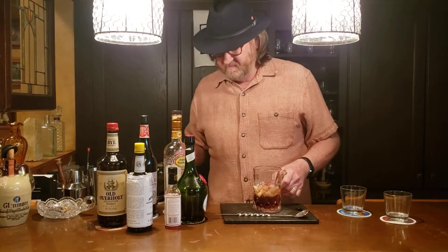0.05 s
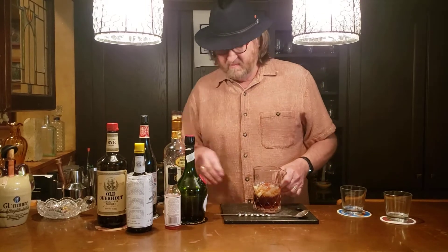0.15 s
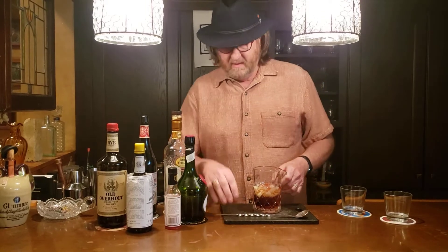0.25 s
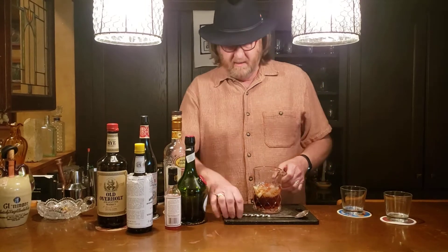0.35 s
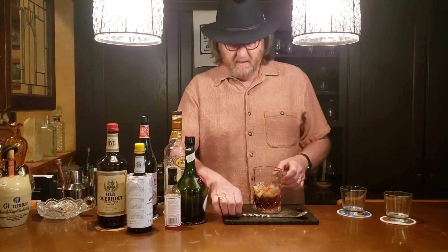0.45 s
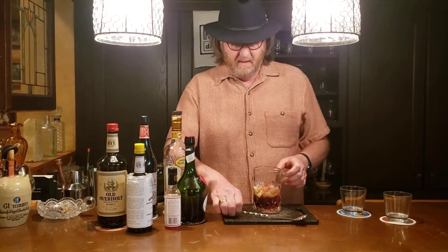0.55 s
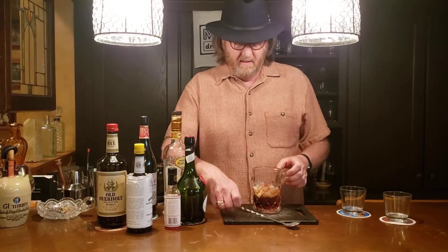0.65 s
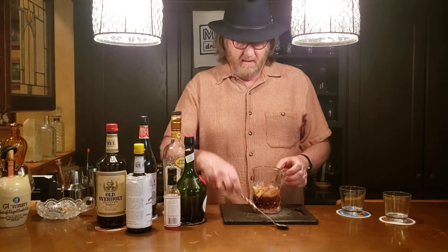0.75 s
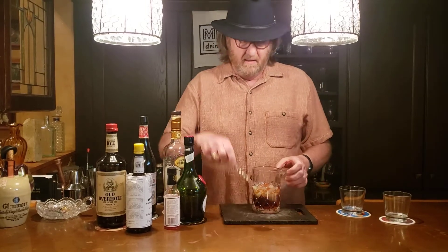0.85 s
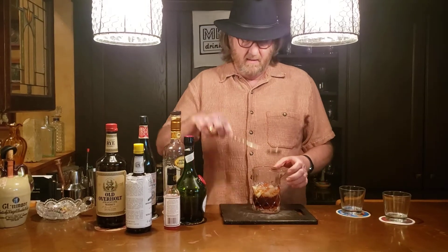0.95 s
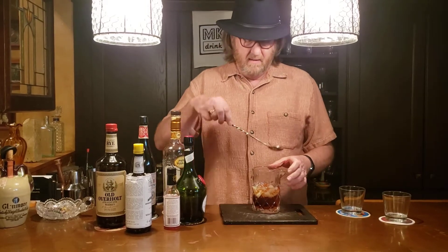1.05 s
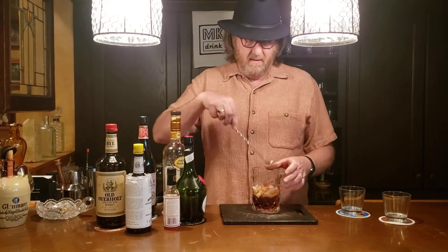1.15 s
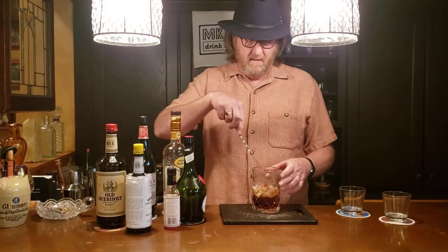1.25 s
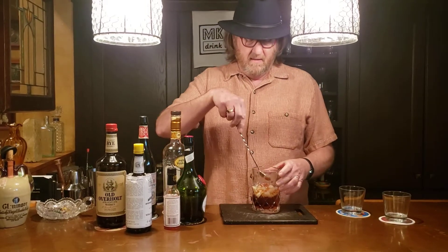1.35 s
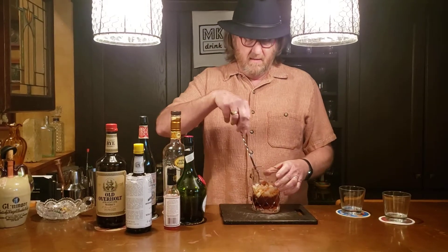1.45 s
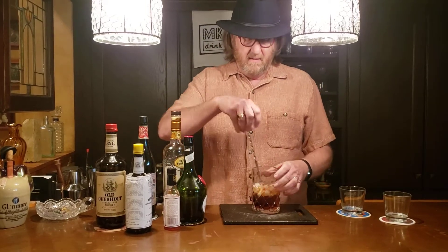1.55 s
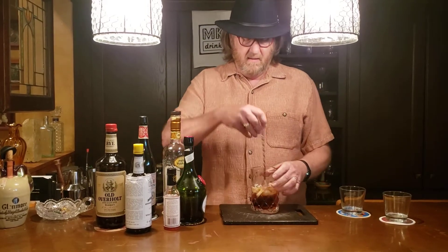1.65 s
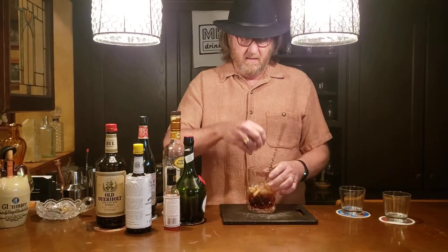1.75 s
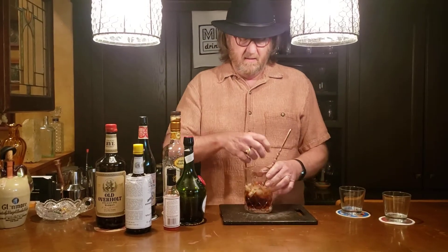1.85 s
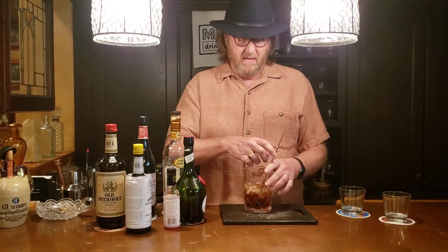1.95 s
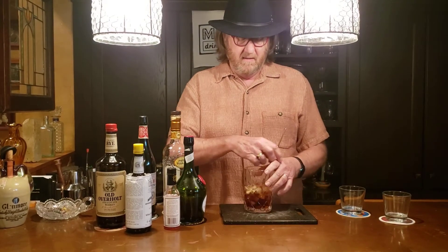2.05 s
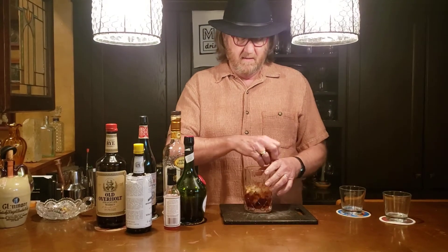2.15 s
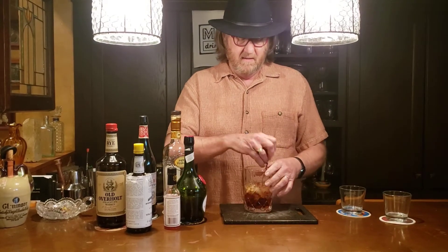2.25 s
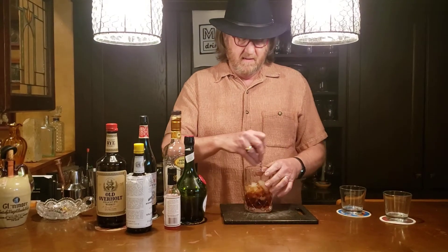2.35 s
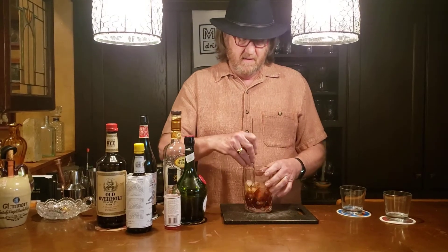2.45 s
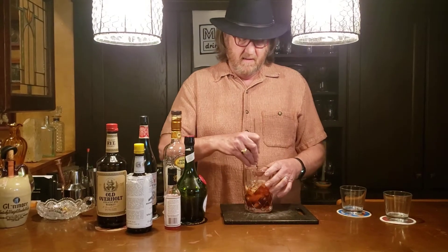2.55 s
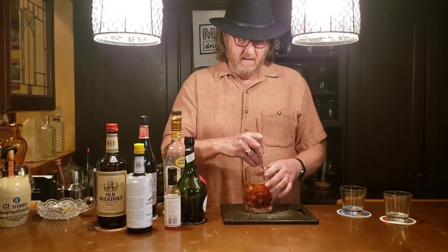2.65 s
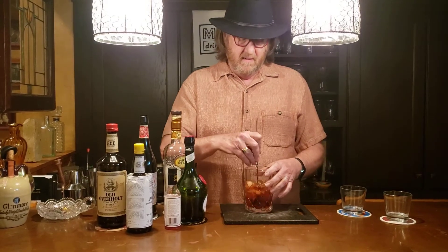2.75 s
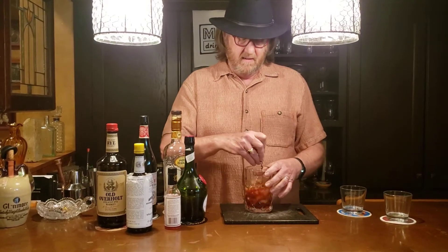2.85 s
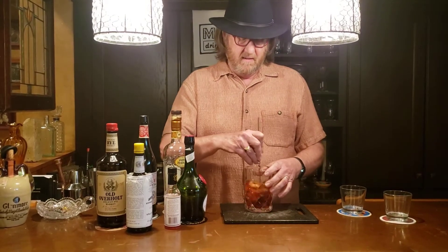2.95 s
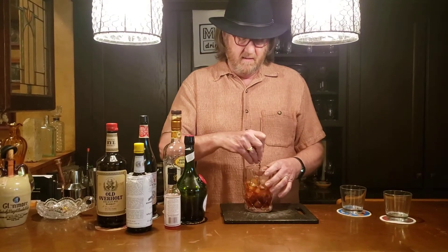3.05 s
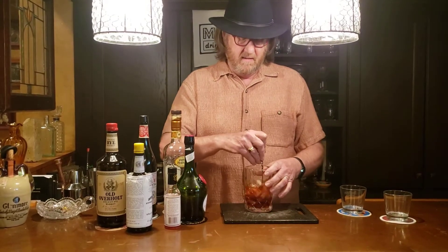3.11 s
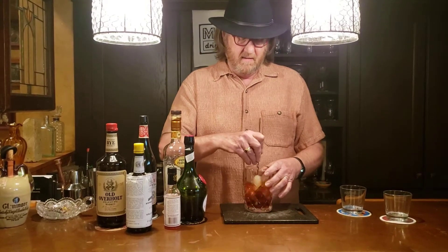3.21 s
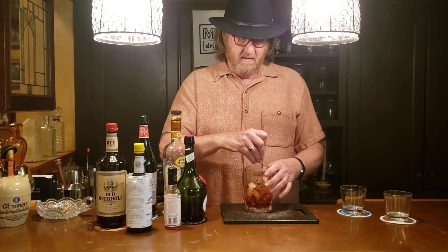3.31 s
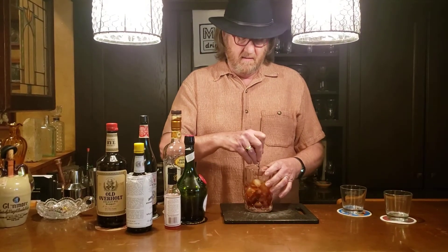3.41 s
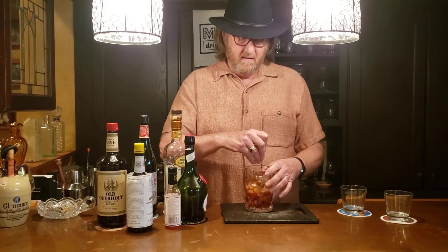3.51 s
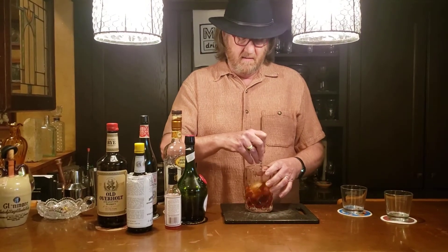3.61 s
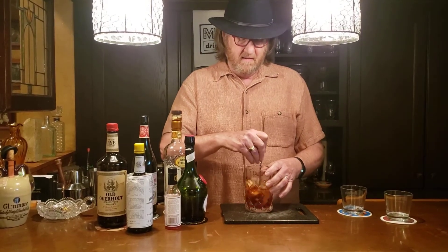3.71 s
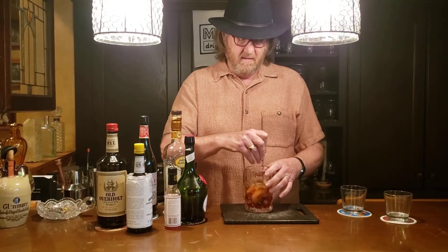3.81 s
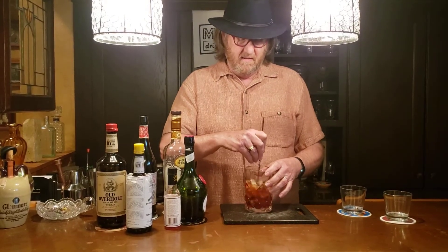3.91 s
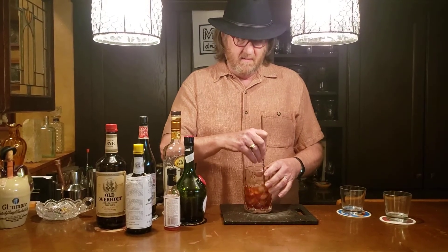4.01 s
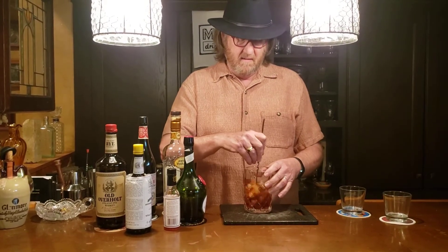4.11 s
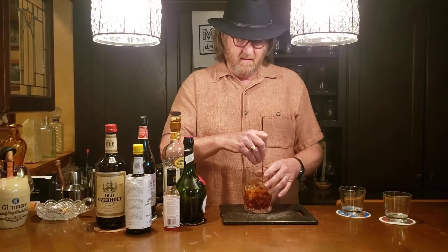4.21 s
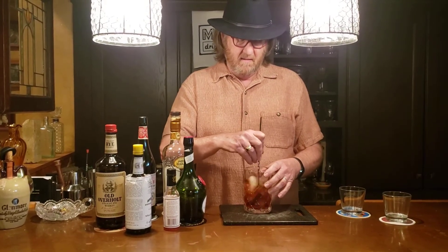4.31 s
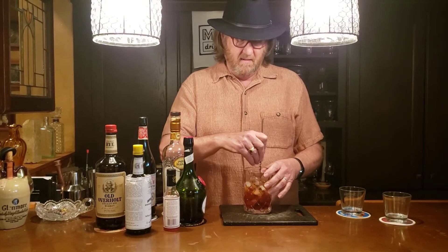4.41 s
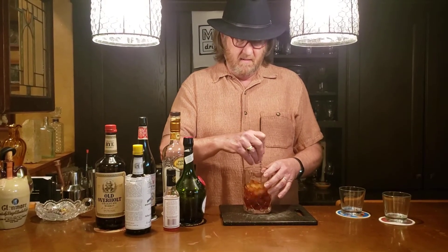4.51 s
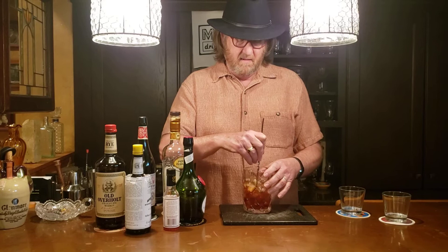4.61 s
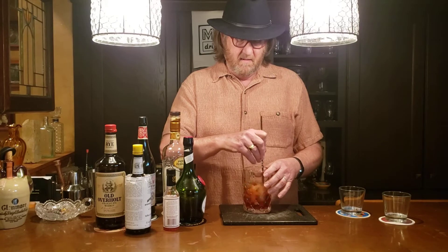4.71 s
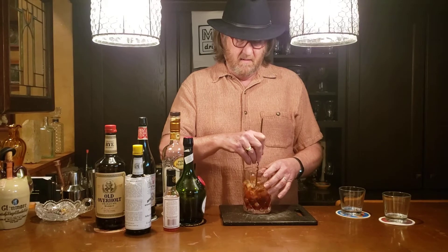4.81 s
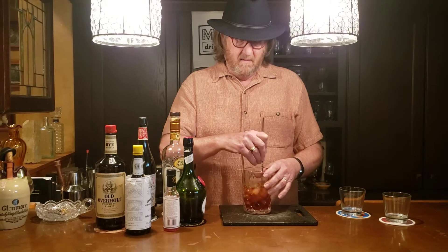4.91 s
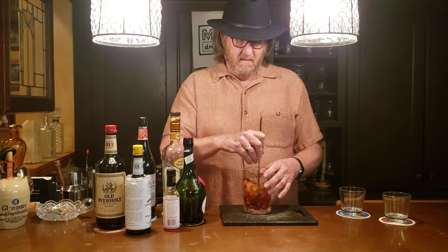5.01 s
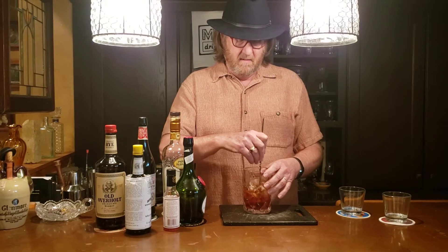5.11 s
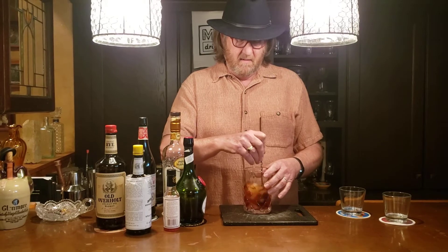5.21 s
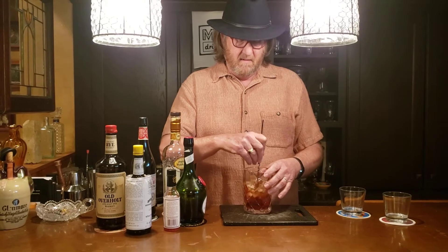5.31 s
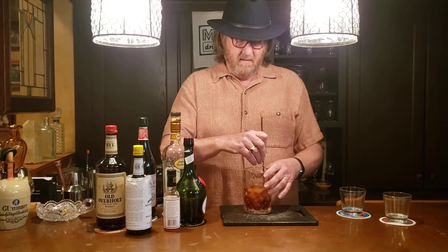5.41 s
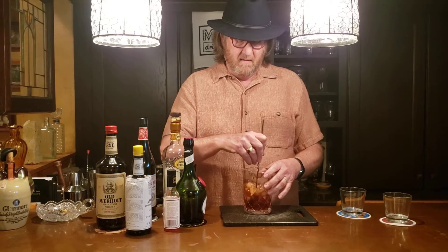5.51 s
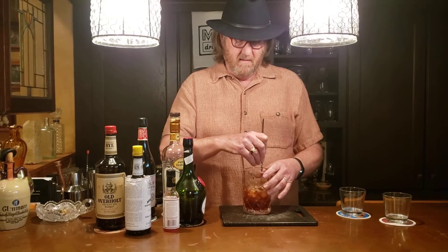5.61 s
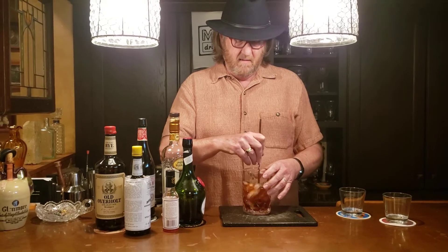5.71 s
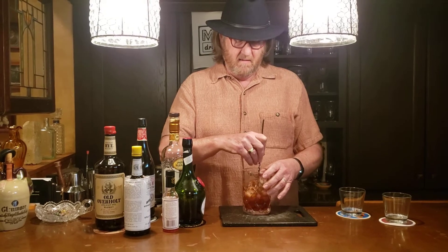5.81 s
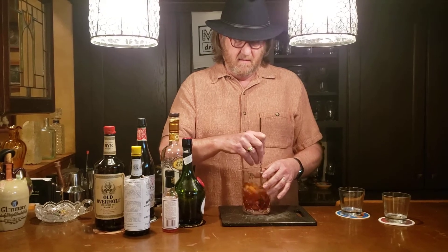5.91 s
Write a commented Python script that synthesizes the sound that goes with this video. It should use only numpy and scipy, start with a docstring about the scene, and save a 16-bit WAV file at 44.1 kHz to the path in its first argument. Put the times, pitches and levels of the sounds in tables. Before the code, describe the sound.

A small indoor room with a faint, slightly wavering low appliance hum and soft air noise throughout. At about 0.4 s a hand lands on a board with soft dull thuds, followed by brief sliding; around 0.65 to 0.76 s the spoon is lifted with a quick cluster of taps and a light clack. From 1.2 to 1.85 s the metal spoon pushes down between ice cubes in a glass: bright knocks, short rattling scrapes, high metallic ringing becoming muffled in the drink, and a bottom tap near 1.7 s. Only faint contacts follow until 2.3 s. Then brisk stirring runs to the end at about 6 s: irregular, rapid ice clinks with a short clear glass ring near 2.2 kHz, varied in strength, over grainy rubbing, ticks and occasional squeaky skids. Small watery gurgles appear after 4 s, and clinks soften slightly towards the end. Close stereo microphones, short lively echo.

```python
"""At a bar counter in a small room, a spoon is picked off a board, pushed between ice cubes and stirred.
Cubes and spoon knock on the glass: each knock is a coloured noise burst plus decaying modes of what is hit.
Between knocks come rubbing ice and ticks of filtered noise, skids of swept resonance and gurgles of gliding sines.
An appliance hums behind as a few sines, heard with a slight waver, over soft noise; two microphones hear it all
with the room's echo of the bar sounds.
"""
import sys
import numpy as np
from scipy import signal
from scipy.fft import rfft, irfft, next_fast_len
from scipy.io import wavfile
from scipy.ndimage import uniform_filter1d

SR = 44100
rng = np.random.default_rng(int(sys.argv[2]) if len(sys.argv) > 2 else 0)


def wrap_up_sound(samples):
    """Save the sound to the file named by the first command line argument, as 16-bit audio."""
    columns = np.atleast_2d(samples).T
    # keep every value between -1 and 1, then stretch to whole-number steps
    tamed = np.clip(columns, -1, 1)
    steps = np.round(tamed * 32767).astype(np.int16)
    wavfile.write(sys.argv[1], SR, steps)


N = 262836
TIME = np.arange(N) / SR
AGE = TIME[:20000]  # seconds since the onset of a single sound


def undb(db):
    """Turn decibels into gain."""
    return 10 ** (np.asarray(db) / 20)


def law(x, points):
    """Read a table of (x, value) joined by straight lines."""
    return np.interp(x, *np.transpose(points))


def along(hz, points):
    """Read a table of (Hz, value) on a log-frequency axis."""
    f, value = np.transpose(points)
    return np.interp(np.log(hz + 1), np.log(f), value)


def colour(x, *spectra):
    """Causal minimum-phase filter whose gain is the sum of some (Hz, dB) tables."""
    size = next_fast_len(len(x) // 2 + 1, True) * 2
    hz = np.fft.rfftfreq(size, 1 / SR)
    gain_db = sum(along(hz, spectrum) for spectrum in spectra)
    cepstrum = irfft(np.log(undb(gain_db)))
    # fold the cepstrum forward so that nothing sounds before the input
    cepstrum[1:size // 2] *= 2
    cepstrum[size // 2 + 1:] = 0
    return irfft(rfft(x, size) * np.exp(rfft(cepstrum)))[:len(x)]


def unit(x):
    """Scale to an RMS of one."""
    return x / np.sqrt(np.mean(x ** 2))


def fade(t60):
    """Exponential decay that falls 60 dB in t60 seconds."""
    return np.exp(-np.log(1000) * AGE / t60)


def add(track, s, sound):
    """Mix a sound in at time s."""
    start = max(int(s * SR), 0)
    track[start:start + len(sound)] += sound[:N - start]


def grains(per_s, spread_db):
    """Random tiny impacts, most weak and a few strong."""
    chance = rng.random(N)
    size = np.minimum(rng.exponential(size=N), 4)
    return (chance < per_s / SR) * undb(spread_db * size) * rng.choice([-1, 1], N)


def stroke(start, length, attack_s, t60):
    """Pressure of one slide: it builds, holds and dies away."""
    build = np.clip((TIME - start) / attack_s, 0, 1)
    return build * np.exp(-np.log(1000) * np.maximum(TIME - start - length, 0) / t60)


def ring(modes, length=1, scatter_db=2.0):
    """Decaying modes; each blow lands elsewhere and weights them a little differently."""
    out = 0
    for hz, db, t60 in modes:
        weight = undb(db + scatter_db * rng.standard_normal()) * rng.choice([-1, 1])
        out = out + weight * np.sin(2 * np.pi * hz * AGE) * fade(t60 * length)
    return out


# close pair of leading wall modes: (frequency [Hz], relative level [dB], nominal t60 [s])
RIM_MODES = [(2240.8, -2.5, 0.19), (2260, -6, 0.27)]


def rim(upper, length=1, sag_hz=0):
    """The wall's leading mode is a close pair; the place of the blow decides which of the two leads."""
    upper = np.clip(upper, .03, .97)
    out = 0
    for share, (hz, db, t60) in zip((1 - upper, upper), RIM_MODES):
        tone = np.sin(2 * np.pi * (hz - sag_hz) * AGE)
        out = out + np.sqrt(share) * undb(db) * tone * fade(t60 * length)
    return out


def crack(tone, body_db, crack_db, treble_db, t60, rise_s=0.00027):
    """A contact: a short noise burst, coloured by the materials and by how hard it is."""
    envelope = fade(t60) * (1 - np.exp(-AGE / rise_s))
    burst = unit(rng.standard_normal(len(AGE)) * envelope) / np.sqrt(len(AGE))  # unit energy
    force = [(1400, body_db), (3300, crack_db), (6200, crack_db), (9000, treble_db)]
    return colour(burst, tone, force)


STIR_START_S, STIR_RISE_S = 2.33, 0.024
LIGHT_RING_DB, LIGHT_CRACK_DB = -44, -49  # relative, like the firm knocks


def light_knocks(count=7):
    """Weak knocks scattered through the stirring, one at random in each equal slot of time."""
    slots = (np.arange(count) + rng.random(count)) / count
    times = STIR_START_S + slots * (TIME[-1] - STIR_START_S)
    return [(s, LIGHT_RING_DB, LIGHT_CRACK_DB) for s in times]


# cubes knocking on the wall: (time [s], relative ring level [dB], relative crack level [dB])
ICE_KNOCKS = [(2.4232, -22.5, -30.5), (2.5521, -51, -43.5), (2.738, -22, -33.5), (2.8727, -22.5, -30),
              (3.0903, -26.5, -33), (3.302, -31.5, -34.5), (3.419, -38, -42), (3.4433, -20.5, -27.5),
              (3.5188, -27, -31.5), (3.6589, -19.5, -30.5), (3.7593, -33, -33.5), (3.886, -20.5, -30.5),
              (3.963, -38, -30.5), (4.078, -36.5, -41.5), (4.1786, -37.5, -43), (4.3437, -27, -33.5),
              (4.4364, -29.5, -30), (4.541, -33.5, -47.5), (4.5858, -25.5, -31), (4.6733, -38, -33),
              (4.8316, -25.5, -30), (4.905, -31.5, -32), (5.0362, -22, -30.5), (5.1419, -30, -29.5),
              (5.2417, -38.5, -46), (5.368, -43, -39), (5.485, -31, -40), (5.6145, -42, -31.5),
              (5.843, -42, -36)]
# spectrum of ice on glass: (frequency [Hz], relative level [dB])
ICE_SPECTRUM = [(100, -31), (400, 2), (750, 1.5), (1100, 12), (1600, 8.5), (2050, 11.5), (2800, 0),
                (3400, 2.5), (4300, 10.5), (5700, 7), (7200, 1), (9000, -1), (12000, 8), (15500, 1)]
# harder knocks are brighter: (crack level [dB], treble against crack [dB])
KNOCK_BRIGHTNESS = [(-45, -6.5), (-30.5, -2)]
# further modes of the glass: (frequency [Hz], relative level [dB], nominal t60 [s])
GLASS_MODES = [(2078, -8, 0.037), (2297, -8.5, 0.071), (4110, -26, 0.014), (4440, -29.5, 0.037),
               (5000, -29, 0.056), (5586, -11, 0.059), (5790, -7, 0.034), (6000, -25, .08)]
# modes of the counter: (frequency [Hz], relative level [dB], t60 [s])
COUNTER_MODES = [(68.7, -6.5, 0.17), (170, -25, 0.099), (218, 0.5, 0.12), (243, -4.5, 0.28),
                 (341.6, -15.5, 0.13), (478, -14, 0.27)]
# a knock's low body follows its crack up to a ceiling
BODY_BELOW_DB, BODY_CEILING_DB = 2, -41.5
# the sloshing drink climbs the wall and lowers its pitch by up to this much
SLOSH_SAG_HZ = 27.1


def ice(ring_db=5, crack_db=25, crack_t60=0.012, glancing_t60=0.07, glass_db=2, thud_db=-20, held=0.45,
        rebound_db=-13, upper_share=.5):
    """Cubes hit the wall: a dry crack and its rebound, the ring of the glass, a faint thud in the counter."""
    cracks, rings = np.zeros(N), np.zeros(N)
    knocks = list(ICE_KNOCKS) + light_knocks()
    for (s, wall, mid), (bounce, spot, slosh) in zip(knocks, rng.random((len(knocks), 3))):
        body = min(mid - BODY_BELOW_DB, BODY_CEILING_DB)
        treble = mid + law(mid, KNOCK_BRIGHTNESS)
        rebound_s = np.interp(bounce, [0, 1], [0.0051, 0.028])
        # hard knocks are one short snap, weak ones a glancing scuff
        contact_t60 = np.interp(treble, [-48, -36], [glancing_t60, crack_t60])
        for delay, db in ((0, crack_db), (rebound_s, crack_db + rebound_db)):
            add(cracks, s + delay, undb(db) * crack(ICE_SPECTRUM, body, mid, treble, contact_t60))
        add(cracks, s, undb(body + thud_db) * ring(COUNTER_MODES))
        # a slow cube stays against the wall and damps it
        length = np.interp(wall, [-27, -19], [held, 1])
        add(rings, s, undb(wall + ring_db) * rim(upper_share * spot, length, SLOSH_SAG_HZ * slosh))
        add(rings, s, undb((wall + mid) / 2 + glass_db) * ring(GLASS_MODES, length))
    return cracks, rings


# spoon on ice and glass: (time [s], ring [dB], crack [dB], downward push [dB]), relative levels
SPOON_KNOCKS = [(1.212, -43, -34, -34.5), (1.265, -27, -32, -40.5), (1.3443, -37, -30.5, -35.5),
                (1.4999, -28, -28, -48.5), (1.7278, -65, -29.5, -29.5), (1.841, -32, -35.5, -38),
                (2.0, -49.5, -56, -67), (2.161, -45, -48.5, -72), (2.369, -26, -39, -49)]
# spectrum of the spoon's contacts: (frequency [Hz], relative level [dB])
SPOON_SPECTRUM = [(100, -16.5), (400, 2), (700, 1.5), (1050, 15), (1500, 4.5), (2100, 14.5), (3300, -1),
                  (5700, 6.5), (7500, -2), (15500, 3.5)]
# the spoon sinks to the bottom and is eased up again: (time [s], depth [0-1])
SPOON_DEPTH = [(1.21, 0.07), (1.48, 0.67), (1.70, 1), (1.85, 0.68)]
# the drink muffles the spoon's bowl: (depth [0-1], treble against crack [dB])
DRINK_MUFFLING = [(0, 9), (.25, -1), (1, -12)]
# the stem rings once the spoon stands on the bottom: (depth [0-1], stem against crack [dB])
STEM_GROUNDING = [(.7, -29), (1, 11.5)]
# modes of the spoon's bowl: (frequency [Hz], relative level [dB], nominal t60 [s])
BOWL_MODES = [(10200, -5.5, 0.092), (11720, -2.5, 0.016), (12030, 3, 0.055), (13400, -14.5, .11),
              (14200, -21, 0.057), (15100, -9, .08)]
# modes of the spoon's stem: (frequency [Hz], relative level [dB], nominal t60 [s])
STEM_MODES = [(1769, -14, .1), (2417, -7, .06), (3189, -7, .13), (3730, -14, .09), (4031, 0, .13),
              (4115, -9, .08), (5513, -12, .12), (6455, -15, .13), (11380, -18, .08)]


def spoon(ring_db=1, crack_db=25, crack_t60=0.013, glass_db=8, bowl_db=0, rim_length=1.2, length=1.2,
          weight_db=7, thud_db=-15, drowned=.25):
    """Steel pushes between the cubes; the loosely held glass rings longer, the bowl and stem ring too."""
    cracks, rings = np.zeros(N), np.zeros(N)
    for s, wall, mid, push in SPOON_KNOCKS:
        depth = law(s, SPOON_DEPTH)
        treble = mid + law(depth, DRINK_MUFFLING)
        stem = mid + law(depth, STEM_GROUNDING)
        add(cracks, s, undb(crack_db) * crack(SPOON_SPECTRUM, push, mid, treble, crack_t60))
        # the push goes down through the glass into the counter
        thud = colour(ring(COUNTER_MODES), [(72, weight_db), (110, -3), (190, 3)])
        add(cracks, s, undb(push + thud_db) * thud)
        add(rings, s, undb(wall + ring_db) * rim(0.71, rim_length))
        add(rings, s, undb((wall + mid) / 2 + glass_db) * ring(GLASS_MODES, length))
        # deeper in the drink the bowl's ring is shorter
        bowl_length = np.interp(depth, [0, 1], [1, drowned])
        add(rings, s, undb(treble + bowl_db) * ring(BOWL_MODES, bowl_length))
        add(rings, s, undb(stem) * ring(STEM_MODES))
    return cracks, rings


# the twisted stem rattling along the cubes: (start [s], length [s], relative level [dB])
STEM_SCRAPES = [(1.222, .09, -44), (1.472, .024, -41), (1.663, 0.063, -41)]
# spectrum of the rattle: (frequency [Hz], relative level [dB])
SCRAPE_SPECTRUM = [(300, -16), (1100, -2.5), (2200, 1), (3800, 3.5), (5300, 5), (7000, -8), (15000, -14.5)]


def scrapes(per_s=1200, spread_db=4, stem_db=-9):
    """The stem chatters over the ice as dense tiny impacts and rings a little."""
    chatter = grains(per_s, spread_db)
    stem = unit(signal.fftconvolve(chatter, ring(STEM_MODES, 0.24))[:N])
    rattle = unit(colour(chatter, SCRAPE_SPECTRUM)) + undb(stem_db) * stem
    return rattle * sum(undb(db) * stroke(s, length, 0.0084, 0.052) for s, length, db in STEM_SCRAPES)


# taps of hand and spoon on the board:
# (time [s], relative thud level [dB], relative tap level [dB], treble slope [dB per octave])
BOARD_TAPS = [(.405, -39.5, -65, 1), (.424, -43, -51, -2.5), (0.444, -46, -48, -5.5),
              (0.652, -49, -38.5, -7.5), (.708, -44.5, -46, -13), (.728, -58, -32, 3.5),
              (.755, -41.5, -34, -4)]
# spectrum of the taps: (frequency [Hz], relative level [dB])
BOARD_SPECTRUM = [(100, 3), (450, 17), (800, 11), (2200, 11), (4500, 6), (8000, -8), (11000, -2.5),
                  (15000, 4.5)]
# fingers and spoon sliding on the board: (start [s], length [s], relative level [dB])
BOARD_SLIDES = [(0.382, 0.05, -43), (0.52, 0.09, -47.5), (0.68, 0.092, -46)]
# spectrum of the sliding: (frequency [Hz], relative level [dB])
SLIDE_SPECTRUM = [(60, 4), (150, -9), (350, 11), (700, -5), (2400, -7.5), (4000, -24), (12000, -46.5)]
SLIDE_ATTACK_S, SLIDE_T60_S = 0.027, .12


def board(crack_db=24, dull_t60=0.03, sharp_t60=0.015, weight_db=11, mid_octaves=0.87, treble_octaves=2.6):
    """A hand lands on the board and drags the spoon, which clacks as it is lifted."""
    pressure = sum(undb(db) * stroke(s, length, SLIDE_ATTACK_S, SLIDE_T60_S)
                   for s, length, db in BOARD_SLIDES)
    out = unit(colour(grains(900, 5.1), SLIDE_SPECTRUM)) * pressure
    for s, thud, body, slope in BOARD_TAPS:
        mid = body + slope * mid_octaves
        treble = body + slope * treble_octaves
        # the duller the contact, the longer it pushes and the more bass it leaves in the counter
        bass_db = np.interp(treble, [-65, -55], [weight_db, 0])
        contact_t60 = np.interp(treble, [-55, -25], [dull_t60, sharp_t60])
        add(out, s, undb(crack_db) * crack(BOARD_SPECTRUM, body, mid, treble, contact_t60))
        add(out, s, undb(thud) * colour(ring(COUNTER_MODES), [(80, bass_db), (170, 0)]))
    return out


# vigour of the stirring: (time [s], relative level of the rubbing ice [dB])
STIR_VIGOUR = [(2.5, -52.5), (2.8, -44.5), (3.82, -50), (4.33, -51), (4.82, -47.5), (5.38, -51),
               (5.66, -49), (5.95, -49)]
# spectrum of rubbing ice: (frequency [Hz], relative level [dB])
RUB_SPECTRUM = [(200, -8), (700, -5), (1600, -2.5), (2200, -1), (3000, -2.5), (4300, 2), (5700, -1),
                (8200, -8.5), (13500, -6), (15500, -16)]


def swirl(rub_db=-3.5, per_s=400, spread_db=2.5, catch_db=-1.0, slip_t60=0.037, nudge_db=-52):
    """Circling cubes catch and slip on each other and keep nudging the wall."""
    stirring = np.clip((TIME - STIR_START_S) / STIR_RISE_S, 0, 1)
    catching = undb(catch_db * unit(uniform_filter1d(rng.standard_normal(N), size=1500)))
    # every slip is a short scuff of noise; their powers add up
    slip_power = signal.fftconvolve(grains(per_s, spread_db) ** 2, fade(slip_t60) ** 2)[:N]
    scuffs = np.sqrt(abs(slip_power)) * catching * rng.standard_normal(N)
    rub = unit(colour(scuffs, RUB_SPECTRUM))
    # light touches keep the wall ringing faintly
    touches = grains(45, 2) * stirring
    nudges = unit(signal.fftconvolve(touches, rim(.5, .6) + ring(GLASS_MODES, .6))[:N])
    return rub * stirring * undb(law(TIME, STIR_VIGOUR) + rub_db) + undb(nudge_db) * nudges


def ticks(per_s=24, spread_db=2.5, tick_db=-7, t60=.016):
    """Corners of the cubes snap past each other: small separate bursts of noise."""
    snaps = grains(per_s, spread_db) * (TIME > STIR_START_S)
    power = signal.fftconvolve(snaps ** 2, fade(t60) ** 2)[:N]
    bursts = np.sqrt(abs(power)) * rng.standard_normal(N)
    return unit(colour(bursts, RUB_SPECTRUM)) * undb(law(TIME, STIR_VIGOUR) + tick_db)


# cubes skidding on each other:
# (start [s], length [s], first frequency [Hz], last frequency [Hz], relative level [dB])
ICE_SKIDS = [(2.654, 0.12, 4350, 2494, -42.5), (3.177, 0.055, 5200, 5460, -43),
             (4.577, 0.05, 3210, 2850, -38), (5.345, 0.073, 2490, 2977, -40.5)]


def skids(width_hz=480):
    """Fine chatter excites a resonance that sweeps as the gap between two cubes changes."""
    out = np.zeros(N)
    smooth = signal.butter(2, width_hz, fs=SR, output="sos")
    chatter = unit(signal.sosfilt(smooth, grains(2700, 6.1)))
    for s, length, first_hz, last_hz, db in ICE_SKIDS:
        progress = np.clip((TIME - s) / length, 0, 1)
        phase = 2 * np.pi * np.cumsum(first_hz + (last_hz - first_hz) * progress) / SR
        out += undb(db) * np.sin(np.pi * progress) * chatter * np.sin(phase)
    return out


# air pockets in the drink:
# (time [s], starting pitch [Hz], relative level [dB], glide [octaves per s])
AIR_POCKETS = [(4.035, 776, -44, 10), (4.064, 970, -41, 7), (4.345, 1165, -41, -3.5),
               (5.245, 1144, -36, 0.5), (5.276, 1053, -38.5, 1), (5.425, 1174, -42, -5),
               (5.817, 943, -38, 6.5)]
GURGLE_T60_S = 0.19


def gurgles(rise_s=0.00075, wobble=0.5):
    """Trapped air rings and wobbles, its pitch gliding as the pocket changes size."""
    out = np.zeros(N)
    for s, hz, db, glide in AIR_POCKETS:
        # the glide stops halfway through the decay time
        pitch_hz = hz * 2 ** (glide * np.minimum(AGE, GURGLE_T60_S / 2))
        phase = 2 * np.pi * np.cumsum(pitch_hz) / SR
        shake = 1 + wobble * unit(uniform_filter1d(rng.standard_normal(len(AGE)), size=300))
        envelope = fade(GURGLE_T60_S) * (1 - np.exp(-AGE / rise_s))
        add(out, s, undb(db) * np.sin(phase) * shake * envelope)
    return out


# partials of the hum: (frequency [Hz], relative level [dB])
HUM_PARTIALS = [(204.6, -63), (253.0, -73), (274.5, -72.5), (430.7, -78.5), (570.6, -74.5)]
# spectrum of the room noise: (frequency [Hz], relative level [dB])
AIR_SPECTRUM = [(30, 18), (90, 5.5), (260, 6.5), (400, -2), (650, 5.5), (1000, -16.5), (4000, -23),
                (15000, -33.5)]
# the hum is heard more softly at the very start, then at a held gain
GAIN_DB, GAIN_START_DB, GAIN_RISE_S = 2, -7, .25


def appliance(air_db=-66, waver=0.26):
    """A motor's hum, whose partials are heard to waver a little, over faint low room noise."""
    knots = np.linspace(0, TIME[-1], num=40)
    hum = 0
    for hz, db in HUM_PARTIALS:
        size, drift = (np.interp(TIME, knots, rng.standard_normal(len(knots))) for _ in range(2))
        tone = np.sin(2 * np.pi * hz * TIME + 2 * waver * drift)
        hum = hum + np.sqrt(2) * undb(db) * (1 + waver * size) * tone
    gain = undb(np.interp(TIME, [0, GAIN_RISE_S], [GAIN_START_DB, GAIN_DB]))
    air = np.array([unit(colour(rng.standard_normal(N), AIR_SPECTRUM)) for _ in range(3)])
    # one noise is common to both channels, the other two are one for each
    return hum * gain + undb(air_db) * (air[2] + 0.5 * air[:2])


# decay of the room: (frequency [Hz], t60 [s])
ROOM_DECAY = [(300, 0.57), (800, 0.4), (2000, 0.34), (5000, 0.34), (13000, 0.22)]


def room_echo(gap_s=.004, early_db=4, early_t60=0.11):
    """Diffuse answer of the room: noise with strong early echoes, treble dying first."""
    noise, echo = rfft(rng.standard_normal(len(AGE))), 0
    hz = np.fft.rfftfreq(len(AGE), 1 / SR)
    for k, (_, t60) in enumerate(ROOM_DECAY):
        band = along(hz, [(f, j == k) for j, (f, _) in enumerate(ROOM_DECAY)])
        echo = echo + irfft(noise * band) * fade(t60)
    echo = echo * (AGE > gap_s) * (1 + undb(early_db) * fade(early_t60))
    return unit(echo) / np.sqrt(len(AGE))


def scene():
    """Mix the sources, then send them direct and by way of the room to two microphones."""
    ice_cracks, ice_rings = ice()
    spoon_cracks, spoon_rings = spoon()
    pickup = board()
    drink = swirl() + ticks() + scrapes() + skids() + gurgles()
    direct = ice_cracks + ice_rings + spoon_cracks + spoon_rings + pickup + drink
    # little of the treble from down in the drink spreads through the room
    send = colour(ice_cracks, [(5500, 3), (9000, -5.5)]) + undb(-6.5) * ice_rings + undb(-2.5) * drink
    send = send + undb(6) * spoon_cracks + undb(3.5) * spoon_rings + undb(2) * pickup
    # long waves reach both microphones alike
    mid = room_echo()
    side = signal.sosfilt(signal.butter(1, 700, "high", fs=SR, output="sos"), room_echo())
    walls = np.array([signal.fftconvolve(send, (mid + sign * side) / np.sqrt(2))[:N] for sign in (1, -1)])
    # the direct sound reaches the right microphone one sample sooner
    return np.array([np.roll(direct, 1), direct]) + walls + appliance()


# the left microphone against the right: (frequency [Hz], level difference [dB])
LEFT_AGAINST_RIGHT = [(100, 2), (1300, 2), (2250, 6), (2900, 8.5), (3900, -2), (5700, -0.5), (7000, 8),
                      (8100, 13), (10000, 4.5), (15000, 7)]
BASS_HZ, TOP_HZ = 61, 15900


def record(dry):
    """The two microphones are shaded differently; deep bass and the top are cut."""
    tilt_db = along(np.fft.rfftfreq(N, 1 / SR), LEFT_AGAINST_RIGHT) / 2
    heard = irfft(rfft(dry) * undb([tilt_db, -tilt_db]), N)
    heard = signal.sosfilt(signal.butter(4, BASS_HZ, "high", fs=SR, output="sos"), heard)
    return signal.sosfilt(signal.ellip(8, .2, 70, TOP_HZ, fs=SR, output="sos"), heard)


dry = scene()
out = record(dry)
wrap_up_sound(out)
```